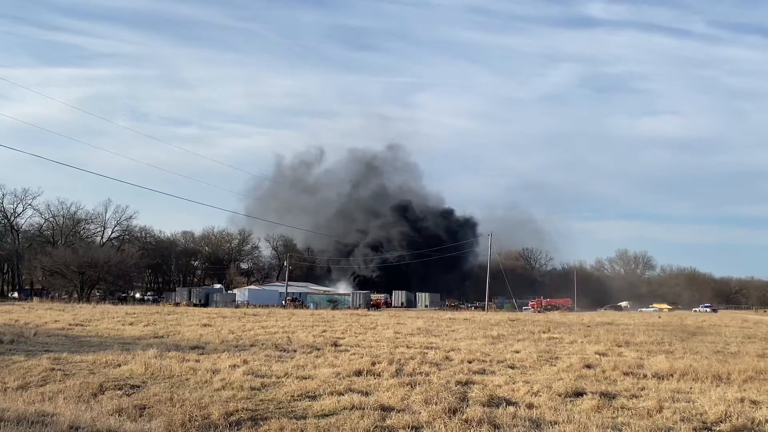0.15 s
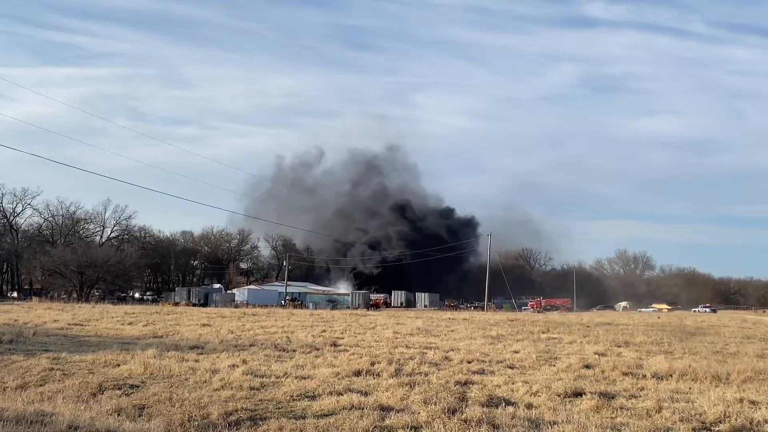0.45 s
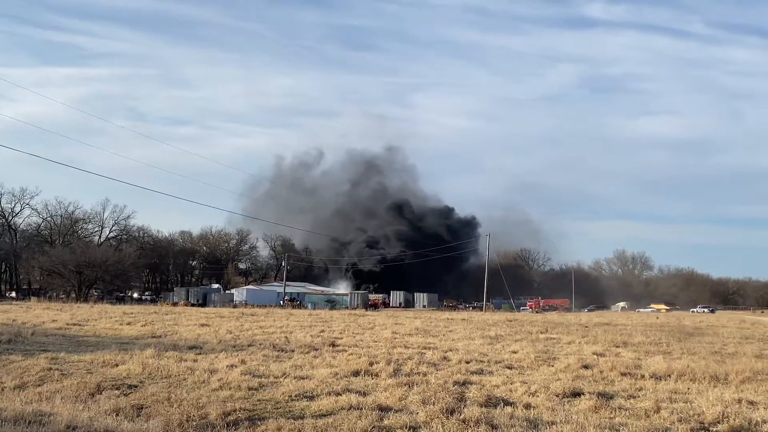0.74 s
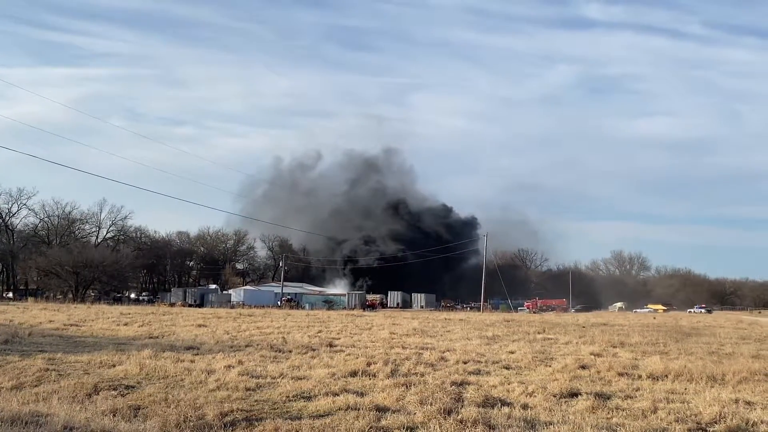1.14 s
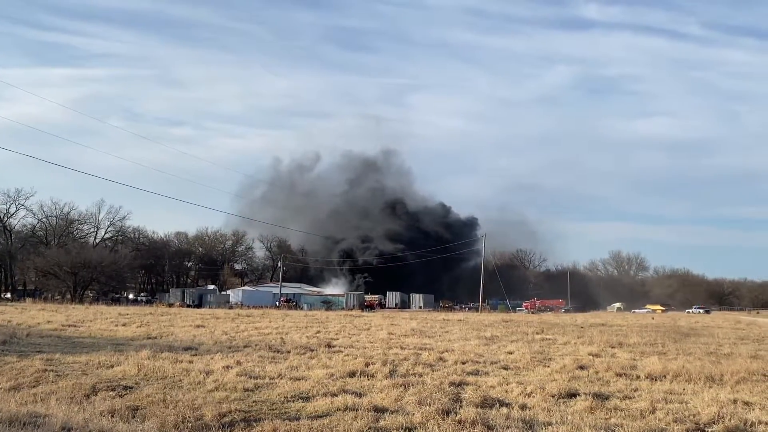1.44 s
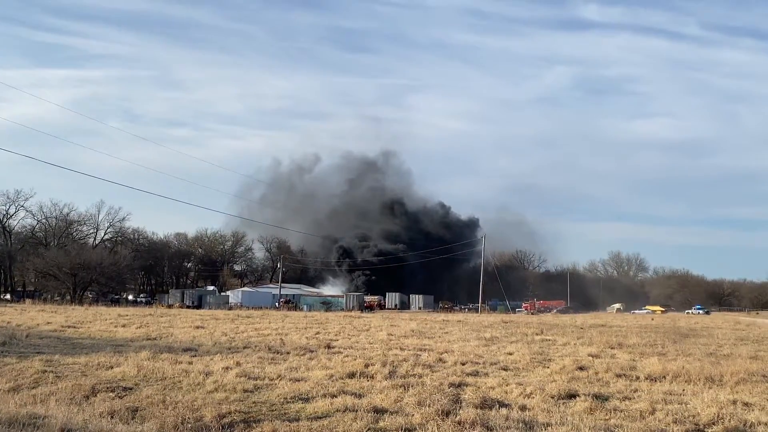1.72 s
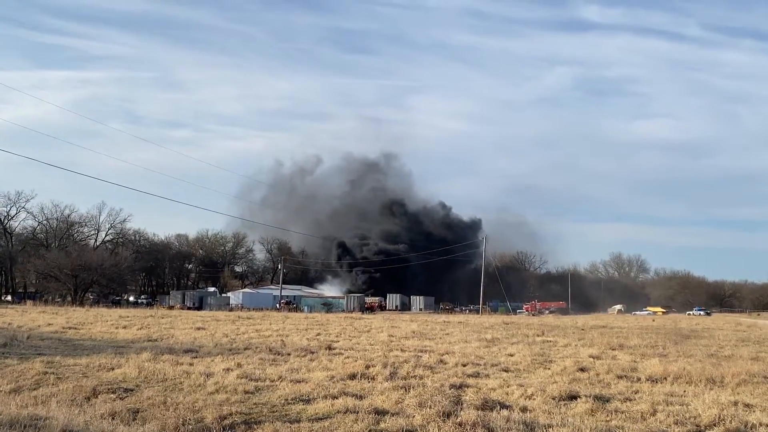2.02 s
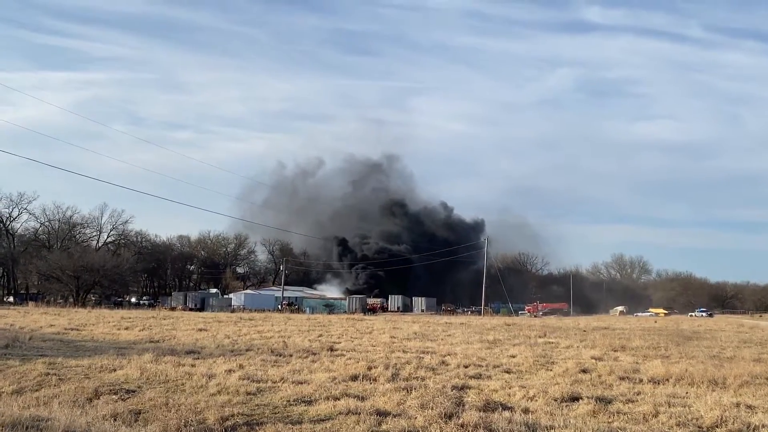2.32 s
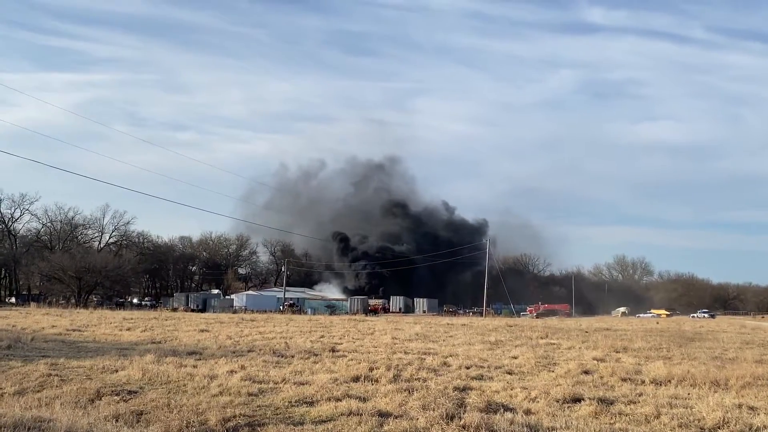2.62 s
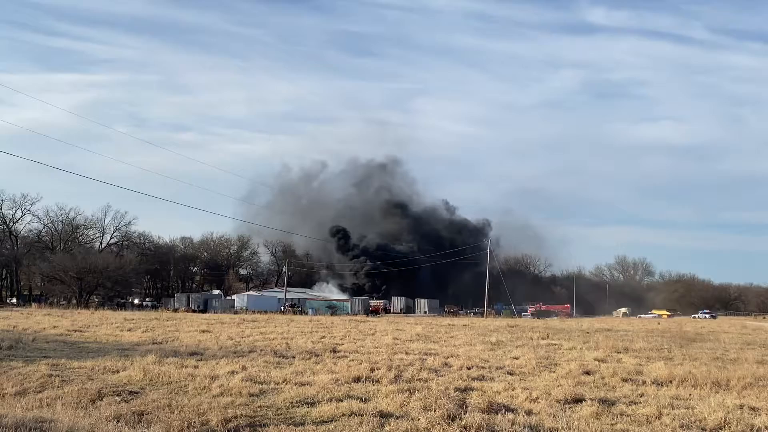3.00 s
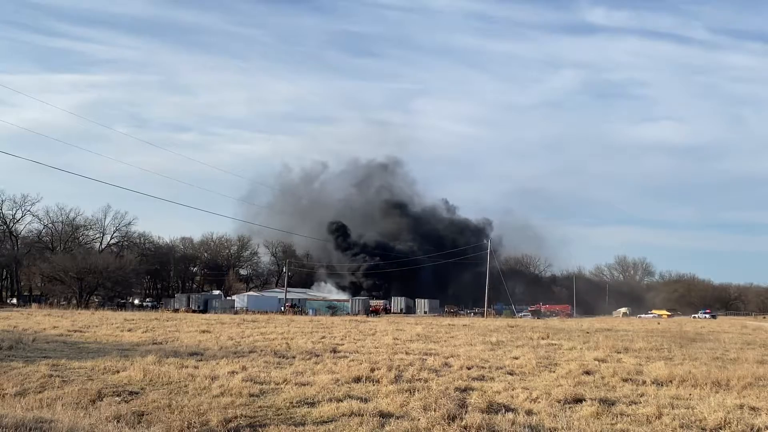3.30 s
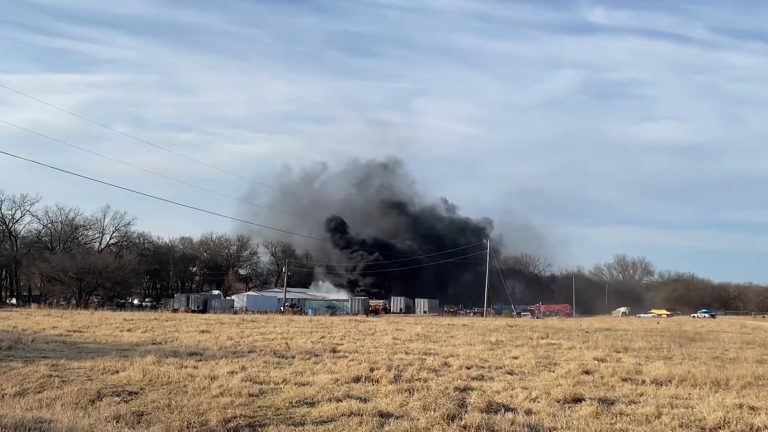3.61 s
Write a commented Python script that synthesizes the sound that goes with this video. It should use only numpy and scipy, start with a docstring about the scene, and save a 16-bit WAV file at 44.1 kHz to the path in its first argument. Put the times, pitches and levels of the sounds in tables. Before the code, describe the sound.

Gusty wind strikes an unprotected close microphone outdoors, with low thumps, sputter and slightly overloaded slaps, strongest around one to one and a half seconds, dipping, then swelling again; a soft distant drone lies behind.

```python
"""A soft distant drone and a brief puff come first; after half a second, gusts hit a bare pair of microphone ports.
Large eddies are slowly lurching noise (rumble) and short sagging tones (thumps); small ones sputter and slap.
The sputter and slaps are noise built from swirls and kicks of pressure; the hardest slaps are clipped softly.
Behind the wind an open field of dry grass hisses as shaped noise, with a few ticks of stalks and a faint whistle."""
import sys
import numpy as np
from scipy import signal
from scipy.fft import rfft, irfft
from scipy.io import wavfile
from scipy.ndimage import uniform_filter1d

SR = 44100
rng = np.random.default_rng(int(sys.argv[2]) if len(sys.argv) > 2 else 0)


def store_pcm(level_fs):
    """Save levels as 16-bit WAV."""
    pcm = np.round(np.clip(level_fs, -1, 1) * 32767).astype(np.int16)
    wavfile.write(sys.argv[1], SR, np.atleast_2d(pcm).T)


N = 165375  # length of the scene in samples


def from_db(db):
    """Turn decibels into a gain."""
    return 10 ** (np.asarray(db) / 20)


def rms_one(x):
    """Scale a signal to unit power."""
    return x / np.sqrt(np.mean(x ** 2) + 1e-20)


def in_time(rows):
    """Read each column of a table over time, sample by sample."""
    times, *columns = np.transpose(rows)
    return [np.interp(np.arange(N) / SR, times, column) for column in columns]


def bins():
    """List the frequencies in the spectrum of a whole signal, in Hz (at least 1)."""
    return np.maximum(np.arange(N // 2 + 1) * SR / N, 1)


def in_frequency(rows):
    """Read each column of a table over log frequency, bin by bin."""
    hz, *columns = np.transpose(rows)
    return [np.interp(np.log(bins()), np.log(hz), column) for column in columns]


def colour(x, spectrum):
    """Shape the tone with a filter that never rings ahead of its input (minimum phase); unit power."""
    cepstrum = irfft(np.log(from_db(in_frequency(spectrum)[0])), N)
    n = np.arange(N)
    causal_half = (n > 0) & (n < N / 2)
    response = np.exp(rfft(cepstrum * 2 * causal_half))
    return rms_one(irfft(rfft(x) * response, N))


def evened(x, window_s):
    """Hold the power steady over spans longer than the window."""
    size = max(int(window_s * SR), 2)
    power = np.mean(np.atleast_2d(x) ** 2, axis=0)
    smooth_power = uniform_filter1d(uniform_filter1d(power, size), size)
    return x / np.sqrt(np.abs(smooth_power) + 1e-4)


def drift(rate_hz):
    """Wander slowly at random with spread 1: noise through two equal low-pass stages."""
    r = np.exp(-2 * np.pi * rate_hz / SR)
    wander = signal.lfilter([1], [1, -2 * r, r * r], rng.standard_normal(N + SR))
    return rms_one(wander[SR:])  # the first second lets the filter settle


# tone of the distant drone: (frequency [Hz], relative level per Hz [dB])
DRONE_COLOUR = [(40, 20.5), (150, 7.5), (350, 1.5), (750, 3.5), (950, -0.5), (1300, 1), (1620, 3.5),
                (2000, -6), (2500, -9.5), (3200, -16.5), (4200, -30), (7000, -60)]
# loudness of the drone: (time [s], level [dB])
DRONE_LEVEL = [(0, -47), (.6, -45), (1.8, -43), (2.2, -41.5), (3.1, -42), (3.75, -41.5)]
# left-right likeness, later limited to -1 (opposite) .. 1 (same): (frequency [Hz], likeness [no unit])
DRONE_LIKENESS = [(60, -1.9), (400, -0.029), (1000, -0.67), (1350, -0.41), (1650, 0.98), (2100, 0.79),
                  (2800, 0.17), (4000, 0.016)]


def drone():
    """Far-off smooth noise; mixing a shared and an opposed part sets how alike the two sides are."""
    alike = np.clip(in_frequency(DRONE_LIKENESS)[0], -1, 1)
    mid, side = rfft(rng.standard_normal((2, N)))
    shared = np.sqrt(1 + alike) * mid
    opposed = np.sqrt(1 - alike) * side * [[1], [-1]]
    pair = irfft(shared + opposed, N)
    return from_db(in_time(DRONE_LEVEL)[0]) * colour(pair, DRONE_COLOUR)


# tone of the dry grass: (frequency [Hz], relative level per Hz [dB])
GRASS_COLOUR = [(1500, -15), (3500, -4.5), (4500, -2.5), (6300, -5), (7600, -0.5), (9500, 6), (12000, -6.5),
                (14500, 3), (16000, -0.5)]
# loudness of the grass before trim, flicker and sway: (time [s], level [dB])
GRASS_LEVEL = [(0, -62), (.3, -61), (.55, -56.5), (1.0, -60), (1.72, -59.5), (2.0, -63.5), (2.65, -62),
               (3.0, -57.5), (3.15, -55), (3.4, -60)]
GRASS_TRIM_DB, GRASS_FLICKER_DB, GRASS_SWAY_DB = -0.5, 1.5, 0.8
PORT_LAG_S, LAG_ABOVE_HZ = .00029, 6900


def grass(apart=0.16):
    """Dry blades hiss, sway and flicker; the top of the hiss reaches the left port later."""
    common = rfft(rng.standard_normal(N))
    lag_s = PORT_LAG_S * (bins() > LAG_ABOVE_HZ)
    late = common * np.exp(-2j * np.pi * bins() * lag_s)
    pair = irfft(np.array([late, common]), N) + apart * rng.standard_normal((2, N))
    level_db = GRASS_TRIM_DB + in_time(GRASS_LEVEL)[0]
    level_db = level_db + GRASS_FLICKER_DB * drift(39) + GRASS_SWAY_DB * drift(14)
    return from_db(level_db) * colour(pair, GRASS_COLOUR)


# stalks that tick, level before trim: (time [s], level [dB], ringing frequency [Hz])
TICKS = [(.559, -29, 7750), (1.299, -38, 14200), (1.785, -39, 4200), (2.099, -37, 14100),
         (3.055, -34, 10500), (3.684, -37, 6300)]
TICK_DECAY_S, TICK_WIDTH_HZ = 0.0014, 100
TICK_SNAP_DB = 1  # bright snap relative to the ring


def ticks(trim_db=-8):
    """A stalk snaps: a short burst of noise, partly ringing at one pitch and partly just bright."""
    out, t = np.zeros((2, N + SR)), np.arange(SR // 20) / SR
    r = np.exp(-np.pi * TICK_WIDTH_HZ / SR)
    for start, db, hz in TICKS:
        burst = rng.standard_normal((2, len(t)))
        resonance = [1, -2 * r * np.cos(2 * np.pi * hz / SR), r * r]
        ring = signal.lfilter([1, 0, -1], resonance, burst)
        snap = signal.lfilter([1, -1], [1], burst)
        tick = rms_one(ring) + from_db(TICK_SNAP_DB) * rms_one(snap)
        i = int(start * SR)
        out[:, i:i + len(t)] += from_db(db + trim_db) * np.exp(-t / TICK_DECAY_S) * tick
    return out[:, :N]


# faint far whistle: (time [s], frequency before waver [Hz], peak level [dB])
WHISTLE = [(2.95, 1640, -70), (2.99, 1610, -49.5), (3.05, 1630, -45), (3.1, 1620, -58), (3.16, 1670, -70)]


def whistle(waver_hz=4):
    """A thin far-off tone: one sine that wavers in pitch and ends a little higher."""
    hz, db = in_time(WHISTLE)
    t = np.arange(N) / SR
    sounding = (t > WHISTLE[0][0]) & (t < WHISTLE[-1][0])
    cycles = np.cumsum(hz + waver_hz * drift(29)) / SR
    return sounding * from_db(db) * np.sin(2 * np.pi * cycles)


# tone of the rumble: (frequency [Hz], relative level per Hz [dB])
RUMBLE_COLOUR = [(15, -2.5), (28, -20), (45, -0.5), (64, 5), (95, 1), (140, -4.5), (190, -6), (320, -64.5)]
RUMBLE_TRIM_DB, RUMBLE_LURCH_DB = 1, 3.5
RUMBLE_APART = .3  # strength of the noise that each port feels alone, beside the shared noise


def rumble(level_db):
    """Large eddies press on both ports nearly alike, in uneven lurches of low noise."""
    air = rng.standard_normal(N) + RUMBLE_APART * rng.standard_normal((2, N))
    lurching_db = RUMBLE_TRIM_DB + level_db + RUMBLE_LURCH_DB * drift(33)
    return from_db(lurching_db) * evened(colour(air, RUMBLE_COLOUR), window_s=0.031)


# large eddies, level before trim: (time of the peak [s], rms level [dB], frequency before wobble [Hz])
THUMPS = [(0.534, -15, 76), (0.772, -19, 102.9), (0.847, -20, 117.2), (0.946, -18, 250.5),
          (1.039, -17, 105.7), (1.13, -13.5, 61.4), (1.296, -15.5, 111), (1.399, -15.5, 104.3),
          (1.53, -17, 144.1), (1.952, -17, 69.8), (2.446, -30, 129.3), (2.655, -24.5, 71.5),
          (2.773, -20, 105.3), (2.884, -24, 138.7), (2.956, -15.5, 120.5), (3.133, -21.5, 120.5),
          (3.205, -19, 121.3), (3.358, -18, 80.4), (3.474, -17, 61.2), (3.631, -17, 134.6)]
THUMP_TRIM_DB, THUMP_RISE_S, THUMP_FALL_S, THUMP_SAG_OCT_PER_S = -6.5, 0.01, .014, 18


def thumps(wobble_oct=0.13):
    """A large eddy passes: a few swings of pressure that swell, sag in pitch and fade."""
    out, wobble = np.zeros(N), wobble_oct * drift(43.0)
    for peak_s, db, hz in THUMPS:
        near = np.abs(np.arange(N) / SR - peak_s) < .07
        t = np.flatnonzero(near) / SR - peak_s
        shape = np.exp(-.5 * (t / np.where(t < 0, THUMP_RISE_S, THUMP_FALL_S)) ** 2)
        pitch = hz * 2 ** (wobble[near] - THUMP_SAG_OCT_PER_S * t)
        swing = np.sin(2 * np.pi * (rng.random() + np.cumsum(pitch) / SR))
        out[near] += from_db(db + THUMP_TRIM_DB) * np.sqrt(2) * shape * swing
    return out


# low-pass corner of the pressure kick of large, middling and small eddies: [Hz]
EDDY_CORNERS_HZ = [620, 1550, 4070]
EDDIES_PER_S, EDDY_SPREAD_DB = 520, 8  # the rate counts all three sizes together


def eddies():
    """Random pressure kicks of either sign and uneven strength; larger eddies kick more softly."""
    out = 0
    for hz in EDDY_CORNERS_HZ:
        born = rng.random(N) < EDDIES_PER_S / len(EDDY_CORNERS_HZ) / SR
        strength = from_db(EDDY_SPREAD_DB * np.minimum(rng.standard_normal(N), 2))
        kicks = born * rng.choice([-1, 1], N) * strength
        r = np.exp(-2 * np.pi * hz / SR)
        out = out + signal.lfilter([1 - r], [1, -r], kicks + 1e-18)
    return out


# tone of the flutter: (frequency [Hz], relative level per Hz [dB])
FLUTTER_COLOUR = [(90, -36.5), (150, -1.5), (220, 0), (310, -3.5), (420, -7.5), (600, -12.5), (1200, -92)]
FLUTTER_TRIM_DB = -0.5
FLUTTER_APART = .42  # strength of the eddies that each port feels alone


def flutter(level_db, own):
    """Small eddies flutter above the rumble: kicks common to both ports plus each port's own."""
    kicks = eddies() + FLUTTER_APART * own
    return from_db(FLUTTER_TRIM_DB + level_db) * evened(colour(kicks, FLUTTER_COLOUR), window_s=0.058)


SWIRL_RISE_CYCLES, SWIRL_FALL_CYCLES, SWIRL_SAG_OCT_PER_CYCLE = 0.36, 0.94, 0.2936


def swirls(rows):
    """Each (time [s], level [dB], pitch [Hz]) is a few swings that swell, sag in pitch and fade."""
    out = np.zeros(N)
    for peak_s, db, hz in rows:
        first = max(int((peak_s - 3 / hz) * SR), 0)
        last = min(int((peak_s + 4 / hz) * SR), N)
        at = np.arange(first, last)
        age = (at / SR - peak_s) * hz  # in cycles
        shape = np.exp(-.5 * (age / np.where(age < 0, SWIRL_RISE_CYCLES, SWIRL_FALL_CYCLES)) ** 2)
        pitch = hz * 2 ** (-SWIRL_SAG_OCT_PER_CYCLE * age)
        out[at] += from_db(db) * shape * np.sin(2 * np.pi * (rng.random() + np.cumsum(pitch) / SR))
    return out


SWIRL_SPREAD_DB, SWIRL_LOW_HZ, SWIRL_HIGH_HZ = 7, 258.5, 1954


def turbulence(count=3800):
    """A dense stream of small swirls, each with its own pitch and strength; higher ones tend to be stronger."""
    hz = SWIRL_LOW_HZ * (SWIRL_HIGH_HZ / SWIRL_LOW_HZ) ** rng.random(count)
    spread_db = SWIRL_SPREAD_DB * np.minimum(rng.standard_normal(count), 2)
    db = 20 * np.log10(hz / SWIRL_HIGH_HZ) + spread_db
    return rms_one(swirls(zip(rng.random(count) * N / SR, db, hz)))


# loudness of the fine sputter before trim: (time [s], level [dB])
SPUTTER_LEVEL = [(0, -62), (.06, -52.5), (.11, -70), (.43, -60.5), (.5, -37.5), (.6, -57.5), (.8, -51.5),
                 (1.0, -37), (1.17, -38), (1.45, -36.5), (1.56, -52), (1.85, -44.5), (2.05, -71),
                 (2.2, -58), (2.27, -38.5), (2.33, -49), (2.7, -49.5), (2.78, -37.5), (2.95, -38.5),
                 (3.05, -63), (3.56, -56), (3.65, -40), (3.69, -58), (3.75, -50)]
# tone of sputter and slaps alike: (frequency [Hz], relative level per Hz [dB])
SLAP_COLOUR = [(100, -8.5), (250, 4.5), (450, 2.5), (750, 3), (1050, -5), (1300, -9), (1800, -18.5),
               (3000, -45.5)]
SPUTTER_TRIM_DB = 0.5


def sputter():
    """Small swirls sputter finely on the ports, under and between the buffets."""
    level_db = SPUTTER_TRIM_DB + in_time(SPUTTER_LEVEL)[0]
    return from_db(level_db) * evened(colour(turbulence(), SLAP_COLOUR), window_s=0.15)


# short buffets, level before trim: (start [s], length [s], level [dB])
BUFFETS = [(0.49, 0.033, -32), (0.643, 0.0027, -31), (0.752, 0.012, -35.5), (0.781, 0.004, -33.5),
           (0.841, 0.017, -34.5), (0.926, 0.037, -26.5), (0.985, 0.031, -26), (1.073, 0.018, -23),
           (1.109, 0.031, -37), (1.216, 0.033, -25), (1.341, 0.02, -29), (1.382, 0.0068, -31),
           (1.441, 0.0088, -22), (1.468, 0.012, -25), (1.491, 0.0063, -23.5), (1.512, 0.01, -20),
           (1.588, 0.029, -27), (1.64, 0.045, -31), (1.723, 0.0043, -24.5), (1.775, 0.011, -28),
           (1.821, 0.011, -31), (1.888, 0.027, -34), (2.287, 0.0037, -27.5), (2.432, 0.0073, -33),
           (2.75, 0.03, -28.5), (2.795, 0.03, -29.5), (2.849, 0.0069, -27.5), (2.876, 0.011, -24),
           (2.92, 0.033, -24.5), (2.987, 0.04, -34.5), (3.075, 0.0064, -31), (3.109, 0.032, -36),
           (3.204, 0.02, -28.5), (3.25, 0.011, -36.5), (3.315, 0.041, -41.5), (3.452, 0.001, -26),
           (3.5, 0.0091, -37), (3.605, 0.033, -32)]
ATTACK_S, RELEASE_S, BUFFET_TRIM_DB = .002, .005, 0.5


def buffet_envelope():
    """Each buffet jumps up, holds and dies away; where they overlap the stronger one counts."""
    t, gain = np.arange(N) / SR, 0
    for start, length, db in BUFFETS:
        before = np.minimum(t - start, 0) / ATTACK_S
        after = np.maximum(t - start - length, 0) / RELEASE_S
        gain = np.maximum(gain, from_db(db + BUFFET_TRIM_DB) * np.exp(before - after))
    return gain


# tone of the crack in a buffet: (frequency [Hz], relative level per Hz [dB])
CRACK_COLOUR = [(600, 4.5), (1100, 11), (1400, 10), (1700, -2), (2100, -11), (3500, -45)]
FIRM_DB, CRACK_DB = -30, -50  # a buffet of FIRM_DB has a crack of CRACK_DB
CRACK_GROWTH = 1.8  # dB of crack per dB of buffet
SLAP_APART = .25  # strength of the eddies that each port feels alone


def buffets(own):
    """Swirls and eddies slap the ports; the crack grows faster than the slap, so hard buffets are brighter."""
    envelope = buffet_envelope()
    kicks = turbulence() + SLAP_APART * rms_one(own)
    slap = envelope * evened(colour(kicks, SLAP_COLOUR), window_s=0.01)
    crack_gain = from_db(CRACK_DB) * (envelope / from_db(FIRM_DB)) ** CRACK_GROWTH
    crack = crack_gain * evened(colour(kicks, CRACK_COLOUR), window_s=0.028)
    return slap + crack


# hardest single slaps, before trim, filter and overload: (time [s], peak level [dB], pitch at the peak [Hz])
SNAPS = [(.494, -20, 800), (.521, -15.5, 850), (.85, -15.5, 700), (.93, -12, 580), (.943, -8.5, 700),
         (.953, -15, 720), (.971, -13, 840), (.999, -11, 760), (1.009, -15.5, 1450), (1.085, -14, 643),
         (1.119, -14, 770), (1.129, -14.5, 1000), (1.22, -19.5, 720), (1.231, -25, 864),
         (1.276, -11.5, 1280), (1.441, -12.5, 1030), (1.516, -8.5, 1120), (1.524, -13.5, 750),
         (1.727, -18.5, 1050), (2.765, -15.5, 1230), (2.853, -17, 930), (2.881, -29, 684), (3.21, -21, 850),
         (3.216, -15.5, 296), (3.612, -12.5, 956), (3.626, -17.5, 390)]
SNAP_TRIM_DB, SNAP_TOP_HZ, SNAP_OVERLOAD_DB = -0.5, 2050, -5


def snaps():
    """Single hard swirls strike the port; a soft limit flattens the hardest, which overload it."""
    lowpass = signal.butter(3, SNAP_TOP_HZ, fs=SR, output="sos")
    strikes = signal.sosfilt(lowpass, from_db(SNAP_TRIM_DB) * swirls(SNAPS))
    top = from_db(SNAP_OVERLOAD_DB)
    return top * np.tanh(strikes / top)


# how the ports differ: (frequency [Hz], lag of the left [radians], left minus right level [dB])
PORTS = [(40, 0.18, 0), (150, 0.36, -0.5), (423, 0.69, -0.5), (980, 1.1, 0), (1430, 1.9, 7.5),
         (1750, 0.43, 11), (2250, 11, 38), (3740, 4, 1)]


def at_ports(x):
    """The air reaches the right port first; the left one is louder from about 1.4 to 3 kHz."""
    lag, balance_db = in_frequency(PORTS)
    half = np.array([[1], [-1]]) / 2  # left, right
    gain = from_db(half * balance_db)
    even_gain = gain / np.sqrt(np.mean(gain ** 2, axis=0))
    return irfft(rfft(x) * even_gain * np.exp(-1j * half * lag), N)


# wind on the ports, before trims and lurches: (time [s], rumble level [dB], flutter level [dB])
WIND = [(0.0, -63, -64), (0.03, -42, -40.5), (0.08, -37, -33.5), (0.11, -45, -62), (0.41, -49.5, -65),
        (0.51, -31.5, -30), (0.54, -31.5, -31.5), (0.58, -42.5, -52), (0.66, -34.5, -33.5),
        (0.74, -41.5, -45.5), (0.76, -34.5, -33), (0.88, -28.5, -29), (0.9, -34, -41), (0.94, -47, -20.5),
        (0.97, -24.5, -26), (1.05, -28.5, -29.5), (1.07, -33, -28), (1.14, -28, -28), (1.18, -33, -36.5),
        (1.22, -32, -43), (1.29, -29, -22), (1.33, -37.5, -48), (1.37, -26.5, -30.5), (1.61, -34.5, -32),
        (1.67, -30.5, -39.5), (1.79, -33, -33), (1.88, -35.5, -58), (1.94, -26.5, -36),
        (2.06, -40.5, -45.5), (2.29, -34, -40.5), (2.39, -49.5, -59), (2.44, -35, -36), (2.51, -48, -64),
        (2.66, -41, -80), (2.7, -59, -48), (2.77, -26.5, -38), (2.91, -32.5, -37), (2.96, -30, -22.5),
        (3.09, -33, -47), (3.13, -29, -24), (3.17, -29.5, -48), (3.21, -28, -26), (3.29, -30, -42),
        (3.33, -27, -35), (3.41, -31.5, -39.5), (3.47, -20.5, -31), (3.58, -29, -40.5), (3.62, -30.5, -20),
        (3.71, -37, -50.5), (3.75, -28, -51)]


def wind():
    """Large eddies rumble and thump; small eddies and swirls add flutter, sputter, slaps and cracks."""
    rumble_db, flutter_db = in_time(WIND)
    own = np.array([eddies(), eddies()])  # felt by one port only
    large = rumble(rumble_db) + thumps()
    small = flutter(flutter_db, own) + sputter() + buffets(own) + snaps()
    return at_ports(large + small)


def scene():
    """The quiet field lies behind the wind on the ports."""
    return drone() + grass() + ticks() + whistle() + wind()


CUTOFF_HZ = 15750


def record(dry):
    """The recorder cuts the top steeply."""
    lowpass = signal.ellip(12, .1, 80, CUTOFF_HZ, fs=SR, output="sos")  # ripple and stop depth in dB
    return signal.sosfilt(lowpass, dry)


dry = scene()
out = record(dry)
store_pcm(out)
```